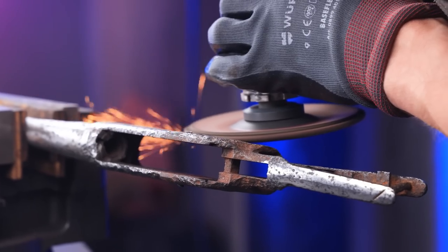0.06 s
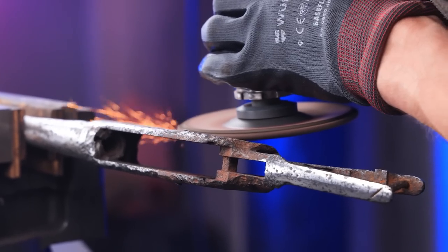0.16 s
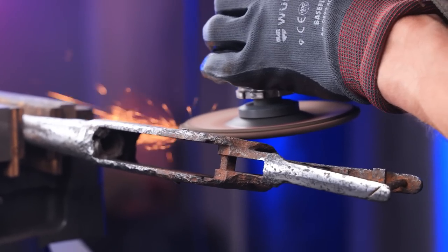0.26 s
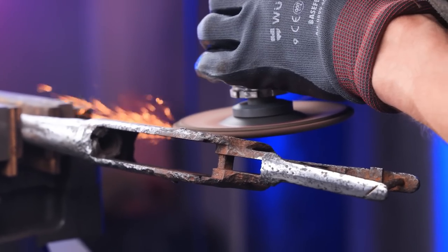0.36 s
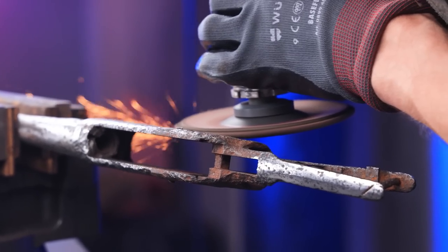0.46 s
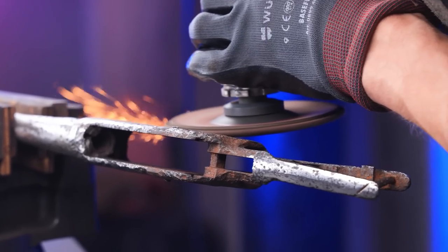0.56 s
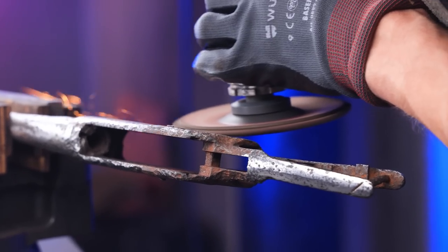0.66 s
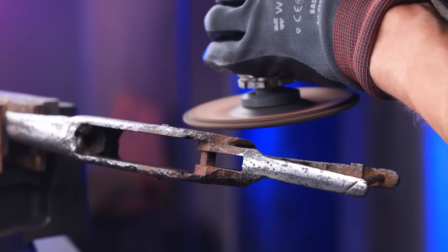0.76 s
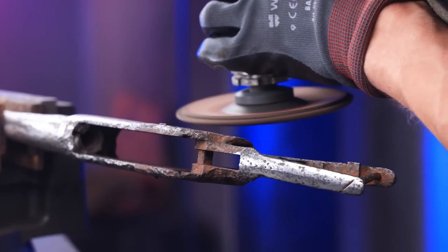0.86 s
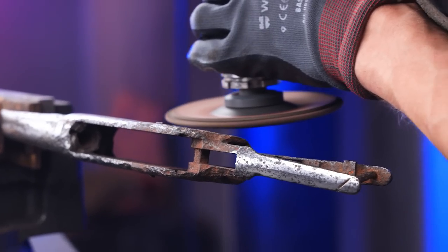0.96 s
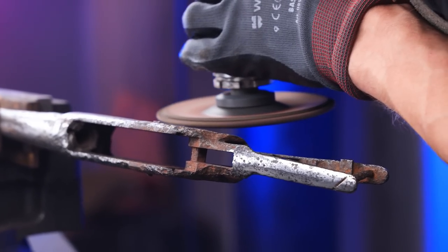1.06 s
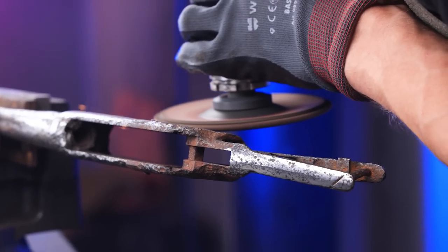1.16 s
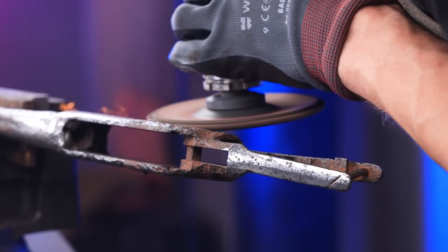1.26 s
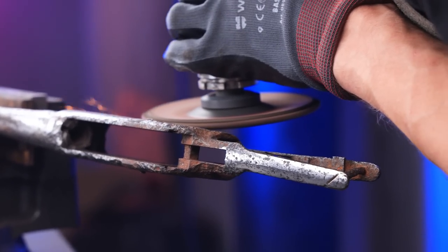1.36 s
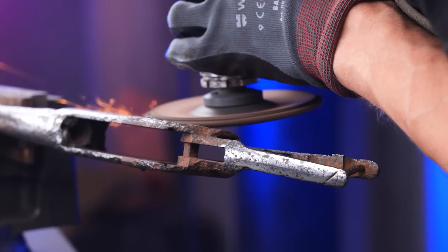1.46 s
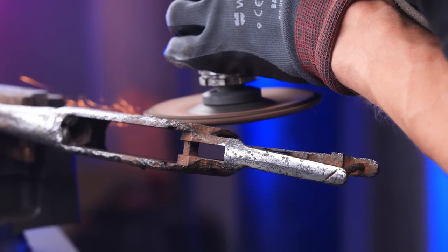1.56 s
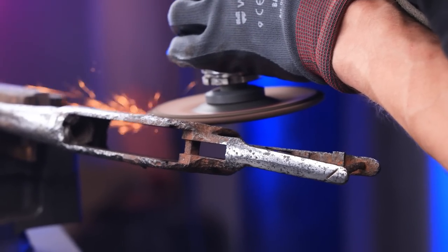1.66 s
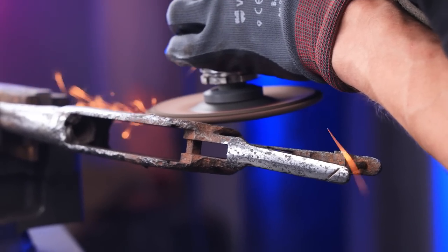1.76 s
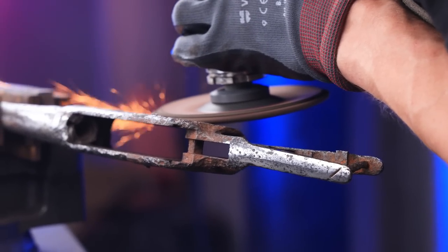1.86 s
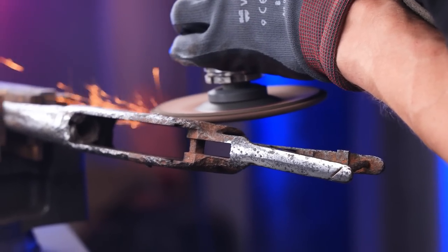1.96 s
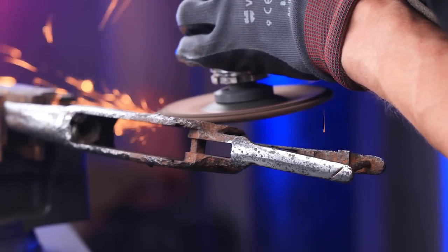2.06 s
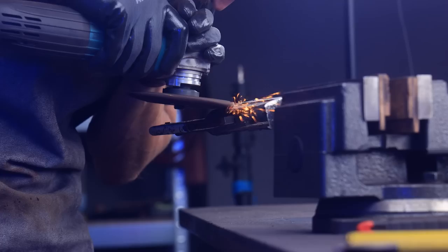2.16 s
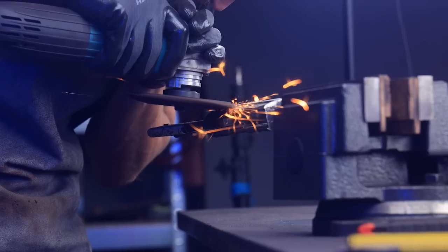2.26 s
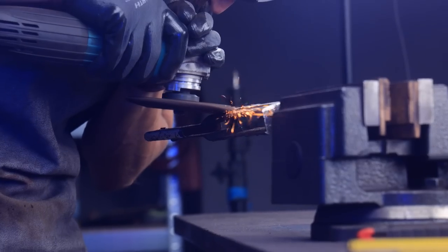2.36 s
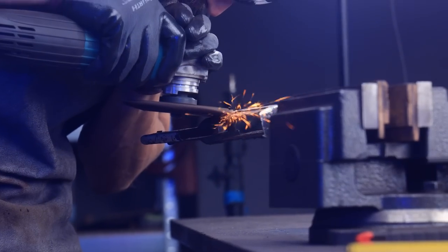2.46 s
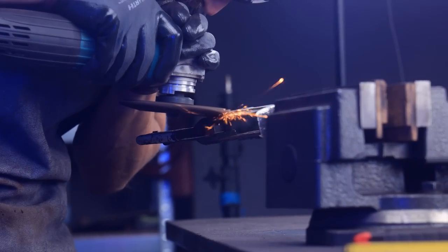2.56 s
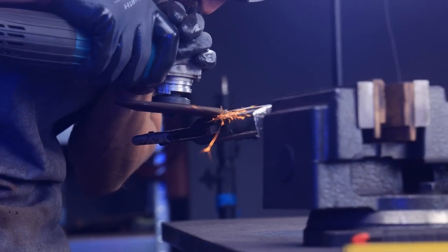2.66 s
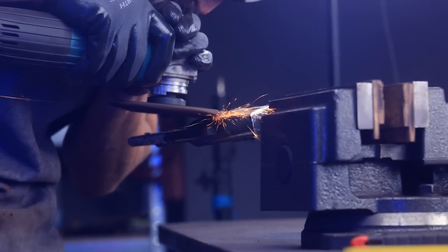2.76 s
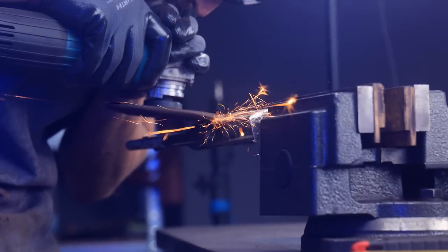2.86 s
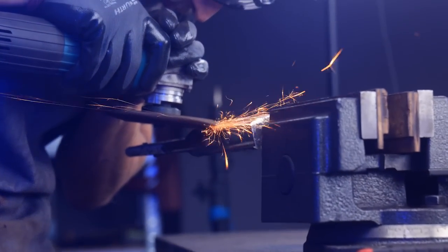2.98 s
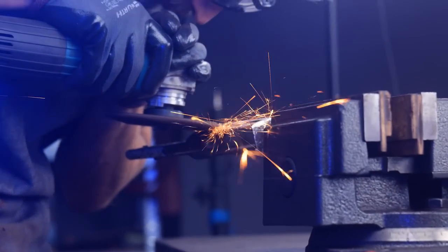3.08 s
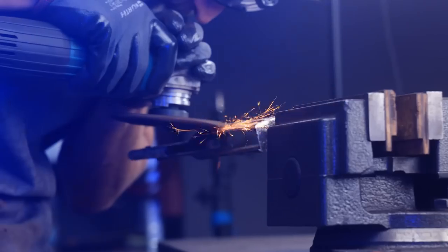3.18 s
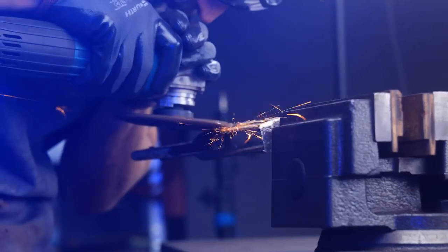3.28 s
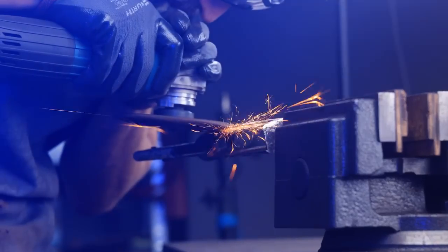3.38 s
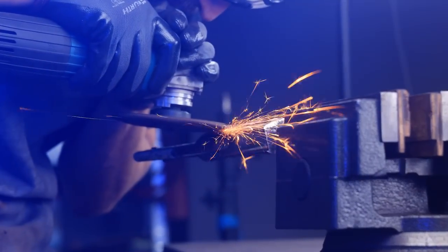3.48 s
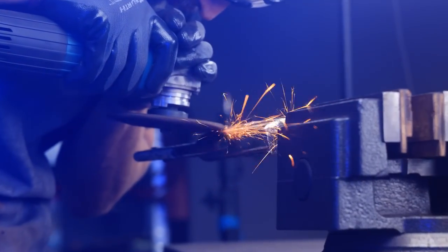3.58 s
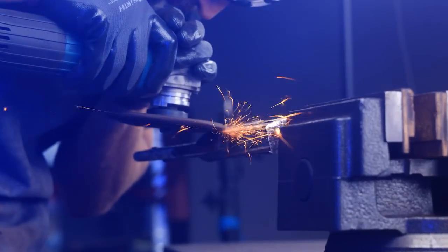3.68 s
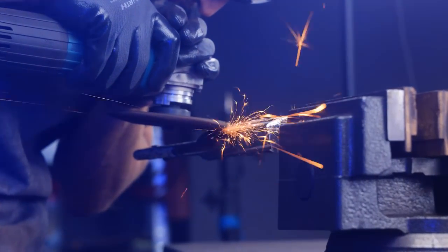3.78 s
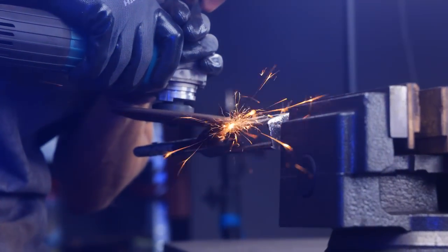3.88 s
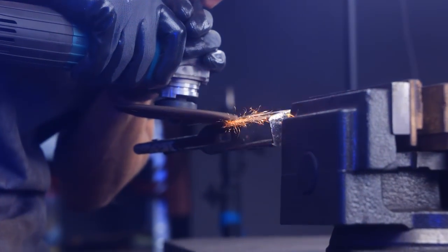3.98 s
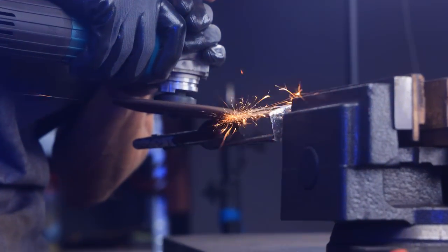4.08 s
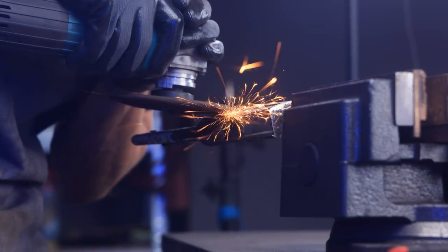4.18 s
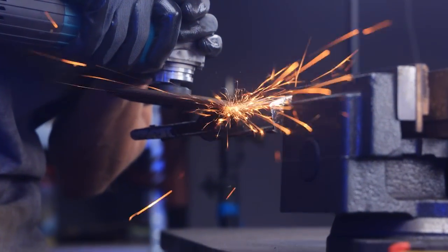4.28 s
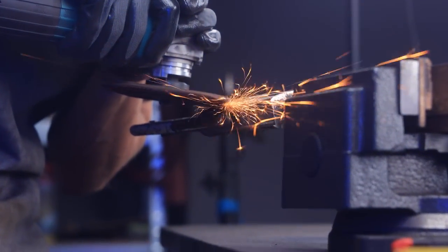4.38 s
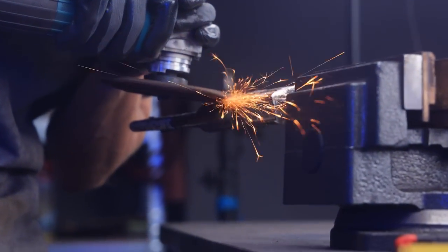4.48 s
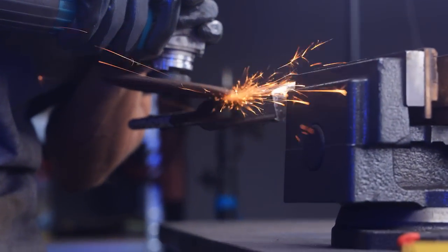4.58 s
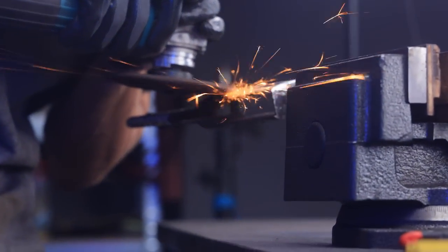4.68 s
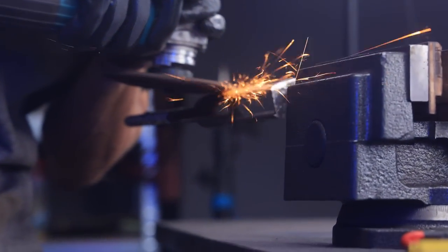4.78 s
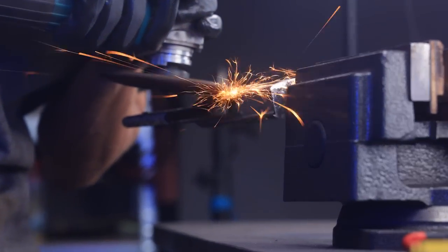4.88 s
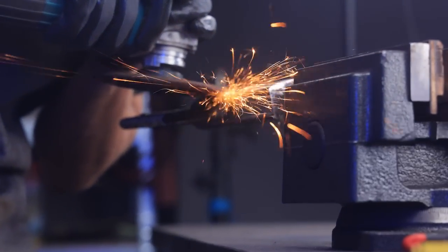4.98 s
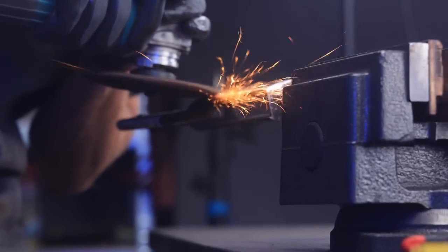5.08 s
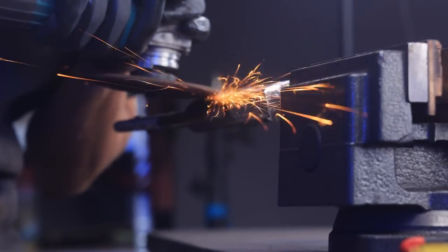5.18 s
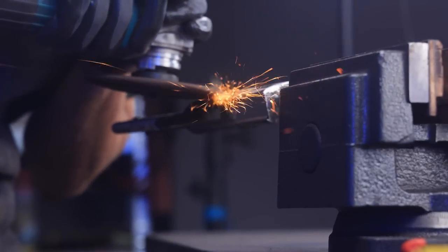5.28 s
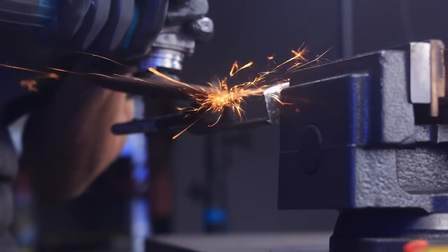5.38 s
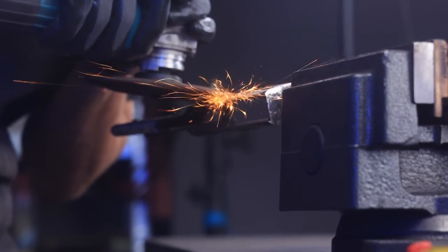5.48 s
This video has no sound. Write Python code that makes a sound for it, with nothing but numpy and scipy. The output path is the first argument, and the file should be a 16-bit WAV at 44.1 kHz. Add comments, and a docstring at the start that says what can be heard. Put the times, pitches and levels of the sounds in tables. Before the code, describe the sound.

Close up and in mono, an angle grinder grinds rusty steel with a bright, gritty, whistling hiss. At about 0.7 seconds the disc lifts, leaving fan hiss and rising motor whine, then gradually bites again. At 2.2 seconds the perspective jumps abruptly to a quieter, wide stereo view, where grinding continues unbroken to the end with small pressure surges, in a workshop without obvious echo.

```python
"""In a workshop an angle grinder works on a rusty steel part: first close up in mono, then further off in stereo.
The disc's grit drags the same pattern over the steel once a turn, so it sings on multiples of the disc speed;
the pattern wears and drifts, and some multiples whistle. The motor's fan hisses throughout and, close up, gets
louder as the lifted disc runs up. Sparks rasp, the armature whines and the workshop hums faintly."""
import sys
import numpy as np
from scipy import signal
from scipy.fft import rfft, irfft, next_fast_len
from scipy.io import wavfile
from scipy.ndimage import uniform_filter1d, map_coordinates

SR = 44100
rng = np.random.default_rng(int(sys.argv[2]) if len(sys.argv) > 2 else 0)


def master(y):
    """Save y as 16-bit WAV."""
    cut = np.clip(np.atleast_2d(y).T, -1, 1)
    pcm = np.round(cut * 32767)  # scale
    wavfile.write(sys.argv[1], SR, pcm.astype(np.int16))


N = 243856

CUT_S = 2.2145  # s, here the listening place jumps from near to far

# how wide the far view is: (frequency [Hz], side minus mid [dB])
WIDTH = [(30, -22), (120, -17), (300, -13), (700, -13), (2400, -2.5), (3500, -4.5), (4400, 2.5),
         (8000, -1.5), (15000, -1)]


def amp(db):
    """Gain of a level in dB."""
    return 10 ** (np.asarray(db) / 20)


def along(points, hz):
    """Read a curve of (Hz, value) points on a log frequency axis."""
    f, v = np.transpose(points)
    return np.interp(np.log(hz + 1), np.log(f + 1), v)


def over_time(points, t):
    """Read a curve of (s, value) points at times t."""
    return np.interp(t, *np.transpose(points))


def drift(t, rate, count):
    """Smooth random curves of spread 1, with rate random points per unit of t."""
    knots = rng.standard_normal((count, 400))
    rows, cols = np.meshgrid(np.arange(count), t * rate, indexing="ij")
    curve = map_coordinates(knots, [rows, cols], order=3)
    return curve / curve.std()


def filtered(x, response):
    """Scale each frequency of x by a response."""
    m = next_fast_len(N + 8192)  # spare room so the end does not wrap onto the start
    spectrum = rfft(x, m) * response(np.fft.rfftfreq(m, 1 / SR))
    return irfft(spectrum, m)[..., :N]


def leaning(hz):
    """Share of the mid that enters the side to make one ear louder than the other."""
    # balance of the far view: (frequency [Hz], left minus right [dB])
    lean = [(380, -0.5), (1300, 4), (2400, 0), (4300, 2.5), (5400, -2), (6700, 3), (11000, 2), (15000, -1)]
    ratio = amp(along(lean, hz))
    return (ratio - 1) / (ratio + 1)


def hiss(spectrum, patchy_db, side):
    """Noise with random louder and softer patches: a mid at rms 1 and, if wanted, a side part."""
    z = signal.stft(rng.standard_normal((2, N)), nperseg=512)[2]
    field = rng.standard_normal(z.shape[1:])
    field = uniform_filter1d(uniform_filter1d(field, 5, 0), 10, 1)  # smooth over frequency, then time
    patchy = z * amp(patchy_db * field / field.std())
    pair = signal.istft(patchy, nperseg=512)[1][:, :N]

    def colour(hz):
        return amp(along(spectrum, hz)) * [np.ones_like(hz), side * amp(along(WIDTH, hz))]

    out = filtered(pair, colour)
    out[1] += side * filtered(out[0], leaning)
    return out / out[0].std()


def controls(t):
    """How the work goes at times t: disc speed, grit level, grit treble and fan level."""
    # the disc sags under load and runs up while lifted: (time [s], speed [turns per s])
    speed_points = [(0.0, 212.3), (0.24, 211.3), (0.54, 208.9), (0.75, 208.9), (0.94, 221.7), (1.04, 226.9),
                    (1.14, 229.9), (1.28, 233.8), (1.38, 233.2), (1.48, 231.1), (1.98, 216.3),
                    (2.214, 212.4), (2.215, 239.0), (2.37, 235.3), (2.61, 231.3), (3.09, 225.9),
                    (3.21, 225.3), (3.37, 225.5), (3.66, 222.5), (4.09, 222.4), (4.44, 219.5),
                    (4.89, 221.3), (5.13, 219.7), (5.33, 221.0), (5.53, 220.5)]
    # the disc on the steel, before bite and pushes: (lands [s], lifts [s], grit level [dB], grit treble [dB])
    passes = [(-1, 0.7, -43, 1), (1.13, 2.3, -42, 0.5), (CUT_S, 6, -51, -1.4)]
    # the hand leans harder or eases for a moment: (time [s], extra grit [dB])
    pushes = [(0.01, 0.5), (0.44, 0), (1.92, 1), (2.05, -1.3), (2.3, 1), (2.7, 1.5), (2.97, 3.5),
              (3.2, 1.5), (3.5, 2), (3.92, 1.5), (4.3, 3), (4.7, 2.5), (5.13, 2), (5.49, 3)]
    push_s, push_dulls = 0.089, 0.97  # half length of a push in s; dB of treble lost per dB of push
    bite_db, bite_s = 15.5, 0.15  # at a landing the grit starts this many dB low, then bites within this time
    dull_db, brighten_s = 13.5, 0.3  # and the treble starts this many dB low, then opens
    lift_db_per_s, lifted_db = 400, -72  # fall at a lift, and the level left in the air
    fan_near_db, fan_far_db = -45.07, -50.57  # fan level at the mean speed close up, and further off
    fan_db_per_turn = 0.06  # rise close up per turn per s

    speed = over_time(speed_points, t)
    grit_db, treble_db = np.zeros((2, len(t)))
    push_db = sum(db * np.exp(-((t - s) / push_s) ** 2) for s, db in pushes)
    for lands, lifts, level_db, bright_db in passes:
        # the far view opens with the disc already cutting
        since = np.abs(t - lands) if lands != CUT_S else np.inf
        bite = bite_db * np.exp(-since / bite_s)
        lift = lift_db_per_s * np.maximum(t - lifts, 0)
        level = np.maximum(level_db + push_db - bite - lift, lifted_db)
        treble = bright_db - push_dulls * push_db - dull_db * np.exp(-since / brighten_s)
        grit_db = np.where(t > lands, level, grit_db)
        treble_db = np.where(t > lands, treble, treble_db)
    fan_near = fan_near_db + fan_db_per_turn * (speed - speed.mean())
    fan_db = np.where(t > CUT_S, fan_far_db, fan_near)
    return speed, grit_db, treble_db, fan_db


def hum(t):
    """Faint low tones of the workshop, wavering in level, the same on both sides."""
    # middle level of each tone: (frequency [Hz], level [dB])
    tones = [(75.4, -108.5), (150.7, -108)]
    sway_db = 3.6 * drift(t, 22, count=len(tones))
    total = 0
    for (hz, db), sway in zip(tones, sway_db):
        total = total + np.sqrt(2) * amp(db + sway) * np.sin(2 * np.pi * hz * t)
    return total * [[1], [0]]


def fan(t, fan_db):
    """The motor's fan stirs the air into hiss, coloured differently near and far."""
    # colour of the fan and air noise, only its shape counts: (frequency [Hz], relative level [dB per Hz])
    near_colour = [(25, -41), (120, -40.5), (300, -34), (750, -27.5), (1400, -19), (2800, -16.5),
                   (3200, -12.5), (3750, -9.5), (3900, -3.5), (4300, -2.5), (4650, -3.5), (5200, 0),
                   (7000, 0.5), (8000, -2.5), (10000, 0.5), (13000, -3), (16000, -7)]
    far_colour = [(25, -41), (120, -40), (300, -29), (750, -22.5), (1000, -19.5), (1300, -10), (2050, -13),
                  (2350, -11), (2600, -8), (3350, -7.5), (3680, -14), (3880, -1), (6400, -3.5), (7300, 1),
                  (9500, -3), (13000, -7), (16000, -23)]
    distant = hiss(far_colour, patchy_db=1.8, side=0.85)
    close = hiss(near_colour, patchy_db=0.5, side=0)
    return amp(fan_db) * np.where(t > CUT_S, distant, close)


def whine(t, turns):
    """The armature turns faster than the disc and whines; its brushes make level and phase uneven."""
    # middle level of the whine: (time [s], level [dB])
    level_points = [(0, -85), (.6, -88), (.8, -85), (1, -86), (1.9, -86.5), (2.2, -88), (2.3, -88),
                    (3.1, -86), (3.5, -81), (4.2, -83.5), (4.6, -87.5), (5.53, -84.5)]
    gear = 3.705  # motor turns per disc turn
    sway_db, slip_rad = 2.1, 0.55  # unevenness of level in dB and of phase in radians
    sway, slip = drift(t, 9, count=2)
    level = np.sqrt(2) * amp(over_time(level_points, t) + sway_db * sway)
    tone = level * np.exp(1j * (2 * np.pi * gear * turns + slip_rad * slip))
    return np.array([tone.real, 0.39 * (t > CUT_S) * tone.imag])


def sparks(t, grit_db):
    """Sparks under load rasp as bright noise that follows the grit level."""
    far = t > CUT_S
    colour = [(3000, -40), (6000, -8), (11000, -2), (16000, 0)]  # (Hz, relative dB)
    rasp = hiss(colour, patchy_db=2.5, side=1) * [np.ones(N), far]
    return rasp * amp(grit_db - np.where(far, 12, 8))


def steel_boom(t):
    """The steel part booms for a moment as the far view opens: noise in two bands that fades away."""
    # (Hz, relative dB)
    colour = [(1200, -42), (1450, -2), (1750, 1), (2100, -29), (2700, 3.5), (3100, 7.0), (3500, -37)]
    level = (t > CUT_S) * amp(-63.5 - 99 * (t - CUT_S - 0.08) ** 2)
    return level * hiss(colour, patchy_db=2.0, side=1)


def grit(turns, wear_near=7, wear_far=6.54, count=75, size=1024, frame_rate=200):
    """One turn's pattern of grit, slowly wearing, is read out at the disc's angle so it sings on multiples."""
    # strength of a multiple at its pitch: (frequency [Hz], level relative to the grit level [dB])
    near_strength = [(420, -53.5), (800, -50), (1200, -40), (3400, -33.5), (4000, -26), (5000, -16),
                     (8000, -17.5), (10500, -16), (16000, -10.5)]
    far_strength = [(420, -46.5), (900, -45), (1200, -32.5), (2200, -29.5), (2600, -33), (4000, -18.5),
                    (5000, -15.5), (8000, -17), (10500, -18.5), (16000, -16)]
    # resonances and dull spots of the steel act on a multiple passing through:
    # (centre [Hz], half width [Hz], near lift [dB], far lift [dB])
    steel = [(1110, 53, 1, 2.5), (1370, 80, 1, -1), (1480, 60, 2.5, 3), (1690, 90, -1, 2),
             (2110, 250, 1, -2.5), (2530, 90, 1.5, 1.5), (3500, 200, 0, -2), (3740, 110, 0, -2.5),
             (4640, 460, -3.5, -7), (4900, 85, -0.5, 4.5), (5760, 120, -3, 0.5), (6570, 200, -3.5, -5.5),
             (7100, 160, 2, 1.5), (9200, 110, 1.3, -2.5), (10800, 200, 2, 0), (11300, 190, -3, -1),
             (12500, 140, -1, 2), (14700, 200, 0, 1), (15400, 210, 1, -3.5)]
    # clearest whistles, each holding steady on one multiple, before the common trim and the sway:
    # (start [s], end [s], multiple of the disc speed [count], level [dB])
    whistles = [(0.0, 0.29, 7, -75.2), (0.0, 0.33, 26, -56.5), (0.0, 0.6, 24, -62.5), (0.4, 0.58, 27, -60),
                (0.0, 0.3, 71, -50.0), (0, 0.42, 29, -58), (0.0, 0.7, 8, -72.7), (0.0, 0.24, 25, -56.5),
                (0.32, 0.53, 25, -55.5), (0.53, 0.7, 25, -60.5), (0.0, 0.7, 31, -58.0),
                (0.0, 0.71, 74, -47.5), (0.11, 0.41, 35, -55.4), (0.12, 0.7, 4, -84.5),
                (0.26, 0.61, 36, -54.9), (0.29, 0.7, 19, -64.8), (0.3, 0.7, 32, -57.0),
                (0.33, 0.69, 71, -49.8), (0.34, 0.51, 59, -53.0), (0.37, 0.61, 67, -53.2),
                (0.38, 0.7, 7, -76.3), (0.44, 0.7, 51, -55.5), (0.45, 0.72, 29, -57), (0.52, 0.74, 26, -60),
                (1.35, 1.53, 17, -65.0), (1.35, 1.55, 19, -59.3), (1.37, 1.58, 28, -56.9),
                (1.38, 1.52, 23, -57.5), (1.38, 1.53, 26, -57), (1.5, 1.72, 30, -60), (1.58, 1.72, 24, -60),
                (1.42, 1.62, 55, -56.4), (1.46, 1.72, 22, -56.5), (1.53, 2.19, 7, -75.5),
                (1.54, 2.19, 5, -78.5), (1.55, 1.85, 19, -64.0), (1.57, 1.82, 26, -58),
                (1.86, 2.02, 26, -57.5), (1.78, 2.12, 27, -60.5), (1.62, 1.92, 6, -76.0),
                (1.65, 1.97, 8, -73.5), (1.68, 1.83, 25, -54), (1.83, 2.02, 25, -57.5),
                (1.69, 1.95, 42, -55.0), (1.8, 2.2, 24, -60), (1.74, 1.9, 22, -60), (1.7, 1.93, 23, -58.5),
                (1.83, 2.11, 69, -50.0), (1.85, 2.19, 71, -52.0), (1.9, 2.2, 30, -58.0),
                (1.95, 2.19, 43, -55.0), (2.07, 2.21, 26, -57), (2.23, 2.43, 7, -72.5),
                (2.22, 2.38, 23, -59.5), (2.23, 2.58, 11, -67.7), (2.23, 2.55, 22, -60.5),
                (2.55, 3.02, 22, -63.5), (2.6, 2.78, 23, -66.5), (2.88, 3.3, 26, -65.5),
                (2.61, 2.81, 38, -62.2), (2.62, 3.4, 5, -79.5), (2.63, 2.95, 11, -72.8),
                (2.75, 3.04, 48, -64.2), (2.8, 3.13, 23, -62), (2.83, 3.23, 56, -63.2),
                (2.85, 3.2, 34, -60.8), (2.9, 3.13, 25, -59.5), (2.89, 3.14, 17, -67.7),
                (2.89, 3.17, 12, -72.6), (3.01, 3.38, 42, -61.4), (3.05, 3.35, 66, -66.9),
                (3.06, 4.26, 11, -70.1), (3.14, 3.54, 22, -60.3), (3.48, 3.72, 28, -64),
                (3.21, 3.46, 52, -64.4), (3.24, 3.49, 58, -63.5), (3.25, 3.6, 48, -62.4),
                (3.34, 3.6, 33, -60.1), (3.39, 3.61, 18, -67.7), (3.39, 3.61, 61, -62.3),
                (3.44, 4.24, 5, -79.5), (3.45, 4.34, 12, -73.4), (3.47, 4.22, 6, -77.3),
                (3.51, 3.81, 34, -59.7), (3.55, 3.78, 49, -62.8), (3.58, 3.81, 60, -62.3),
                (3.65, 4.18, 18, -69.2), (3.74, 4.04, 25, -60.7), (3.8, 5.5, 4, -86.0),
                (3.83, 4.7, 41, -61.8), (3.88, 4.46, 34, -58.3), (3.96, 4.33, 22, -62.9),
                (4.06, 4.26, 44, -61.1), (4.12, 4.47, 56, -62.5), (4.16, 4.78, 25, -58.3),
                (4.78, 5.07, 25, -62), (5.3, 5.52, 27, -63), (4.28, 4.74, 69, -62.9),
                (4.34, 4.78, 15, -69.8), (4.93, 5.22, 15, -71), (4.35, 4.63, 52, -64.1),
                (4.35, 4.65, 14, -72), (4.38, 4.61, 43, -62.7), (4.42, 4.68, 23, -62.6),
                (4.49, 4.79, 34, -60.9), (4.53, 5.1, 22, -63.3), (4.57, 5.23, 13, -71),
                (4.62, 5.02, 28, -62.6), (4.62, 5.1, 5, -81.5), (4.79, 5.0, 14, -70.3),
                (4.81, 5.07, 49, -63.7), (4.91, 5.18, 34, -60.3), (4.99, 5.23, 31, -59.4),
                (5.05, 5.31, 63, -61.8), (5.07, 5.51, 23, -60.0), (5.15, 5.5, 22, -62),
                (5.2, 5.46, 25, -59.1), (5.23, 5.49, 13, -71.1), (5.26, 5.51, 12, -70.7),
                (5.3, 5.51, 43, -63.9)]
    # the disc is out of balance and hums once a turn: (time [s], level [dB])
    unbalance = [(0, -90), (.74, -92.5), (.82, -101), (1.08, -99), (1.46, -91.5), (1.67, -94), (1.82, -103),
                 (2.21, -89), (2.25, -101), (4.4, -98.5), (5.53, -99.5)]
    whistle_db, whistle_sway_db = -0.5, 1.5  # trim of all whistles; how far they swell and fade
    whistle_chatter = 0.75  # a whistle flutters this much of what the rest does

    # moments at which the pattern is drawn, frame_rate a second
    t = (np.arange(N * frame_rate // SR + 2) - 0.1) / frame_rate
    since_start = t - t[0]
    speed, grit_db, treble_db, _ = controls(t)
    far = t > CUT_S
    hz = np.arange(1, count + 1)[:, None] * speed

    # level of each multiple in dB
    level = grit_db + np.where(far, along(far_strength, hz), along(near_strength, hz))
    level = level + treble_db * np.clip((hz - 9500) / 3000, 0, 1)
    shape = 0
    for centre, width, near_db, far_db in steel:
        shape = shape + np.where(far, far_db, near_db) / (1 + ((hz - centre) / width) ** 2)
    level = level + shape

    # each multiple swells, fades and slips in phase as grains break away
    wear = np.cumsum(np.where(far, wear_far, wear_near)) / frame_rate + 3 * far  # skips ahead at the far view
    swell = drift(wear, 0.98, count=2 * count)
    slip = drift(wear, 0.99, count=2 * count)
    spread_db = np.where(far, 3.0, 2.4)
    start_phase = 2 * np.pi * rng.random((2 * count, 1))
    pattern = amp(1.0 + spread_db * swell) * np.exp(1j * (0.91 * slip + start_phase))
    mid, side = np.split(pattern, 2)
    mid = mid * amp(level)
    side = side * amp(level + along(WIDTH, hz)) * far

    # a whistle takes the place of its multiple in the mid and strengthens it in the side
    sung = np.zeros_like(mid)
    for start, end, multiple, db in whistles:
        row = round(multiple) - 1
        hold = np.clip(np.minimum(t - start, end - t) / 0.1 + 0.4, 0, 1)
        hold = hold * (far == (start > CUT_S))  # stays within its own view
        sung[row] += hold * np.sqrt(2) * amp(db + whistle_db) * np.exp(1j * start_phase[row])
        mid[row] = mid[row] * (1 - hold)
        side[row] = side[row] * (1 + 0.58 * hold)

    # the disc chatters on the rust: quick flutter, stronger on the high multiples
    depth = np.where(far, 0.36, 0.45) * np.clip(hz / 6000, 0.45, 1.35)
    chatter = depth * (drift(since_start, 30, count=count) + 1j * drift(since_start, 30, count=count))
    flutter = (1 + chatter) / np.sqrt(1 + 2 * depth ** 2)
    whistle_sway = amp(whistle_sway_db * drift(since_start, 7, count=count))
    mid = mid * flutter + sung * (1 + whistle_chatter * chatter) * whistle_sway
    side = side * flutter + far * leaning(hz) * mid

    # the first multiple is the hum of the unbalance
    mid[0] = np.sqrt(2) * amp(over_time(unbalance, t))
    side[0] = 0.3j * far * mid[0]

    out = []
    moment = (np.arange(N) / SR - t[0]) * frame_rate
    for part in (mid, side):
        # turn the strengths of the multiples into the shape of one turn
        padded = np.pad(part, ((1, size // 2 - count), (0, 0)))
        table = irfft(padded, size, axis=0) * size / 2
        table = np.vstack([table, table[:1]])  # the turn closes on itself
        out.append(map_coordinates(table, [turns % 1 * size, moment], order=1))
    return np.array(out)


def scene():
    """Add the mid and side of all sources and turn them into left and right."""
    t = np.arange(N) / SR
    speed, grit_db, _, fan_db = controls(t)
    speed = speed + 0.1 * drift(t, 9, count=1)[0]  # turns per s: the hand's pressure is never quite even
    turns = np.cumsum(speed) / SR
    background = hum(t) + fan(t, fan_db) + whine(t, turns)
    mid, side = background + sparks(t, grit_db) + steel_boom(t) + grit(turns)
    return np.array([mid + side, mid - side])


def record(dry):
    """Cut off everything above a band limit, then add a trace of circuit noise, the same on both sides."""
    top_hz = 15760
    return filtered(dry, lambda hz: hz < top_hz) + amp(-103) * rng.standard_normal(N)


dry = scene()
out = record(dry)
master(out)
```